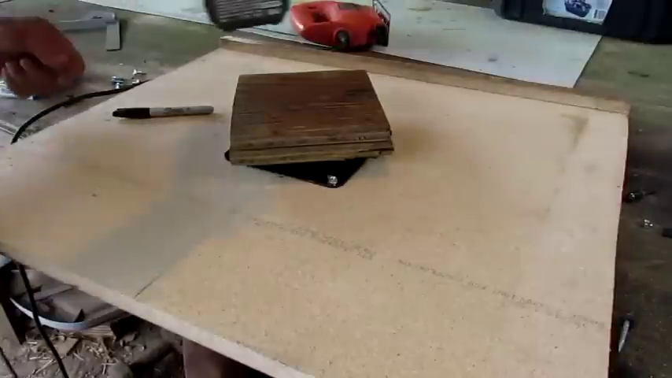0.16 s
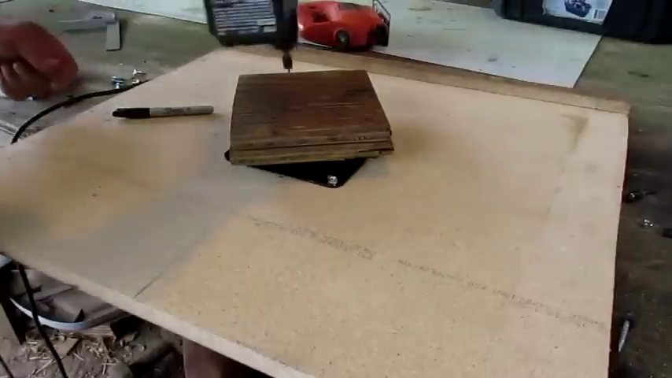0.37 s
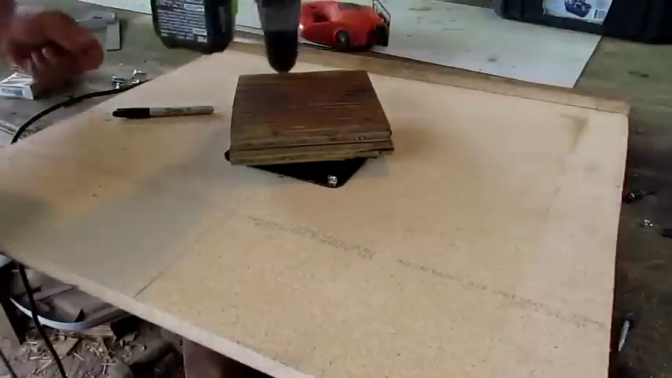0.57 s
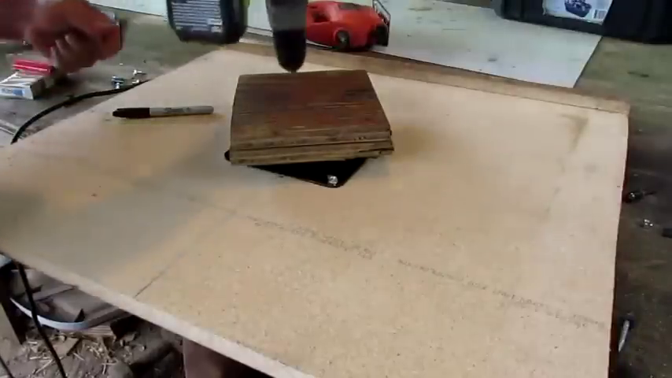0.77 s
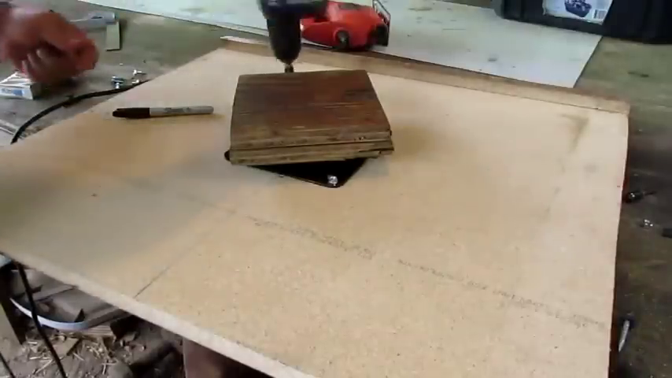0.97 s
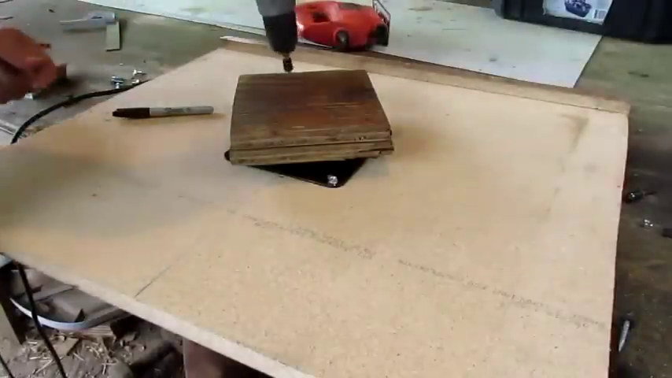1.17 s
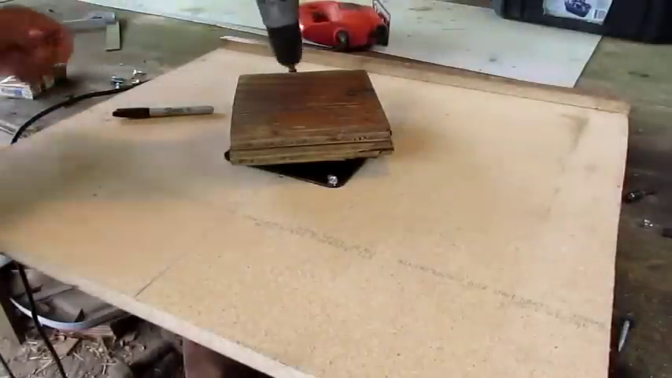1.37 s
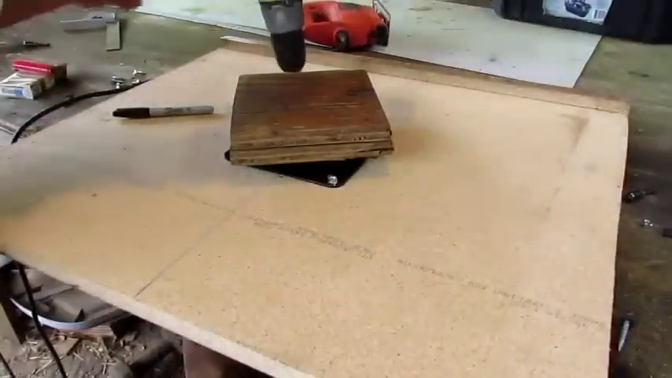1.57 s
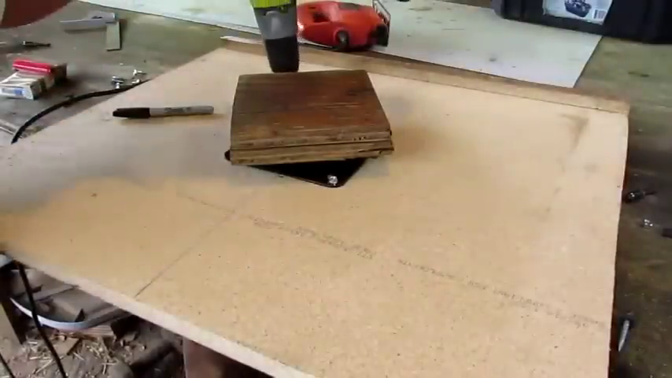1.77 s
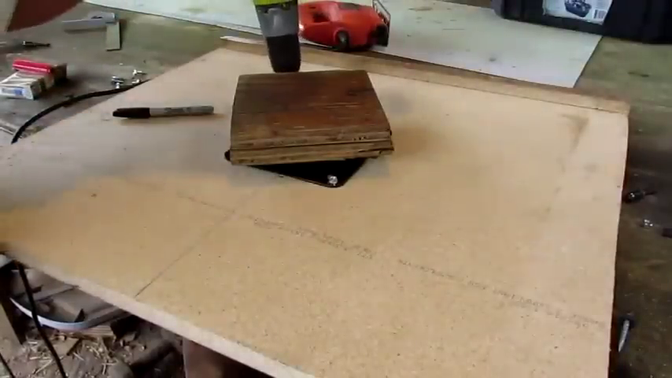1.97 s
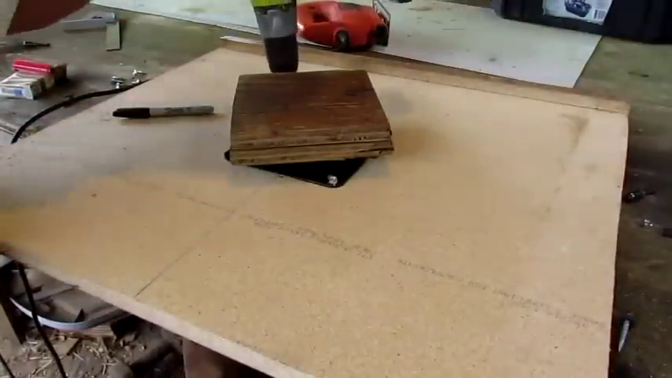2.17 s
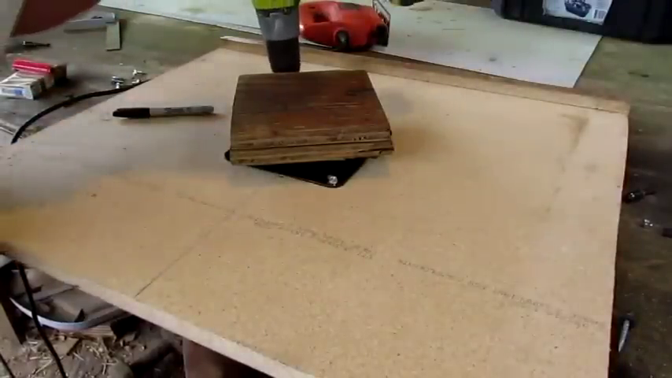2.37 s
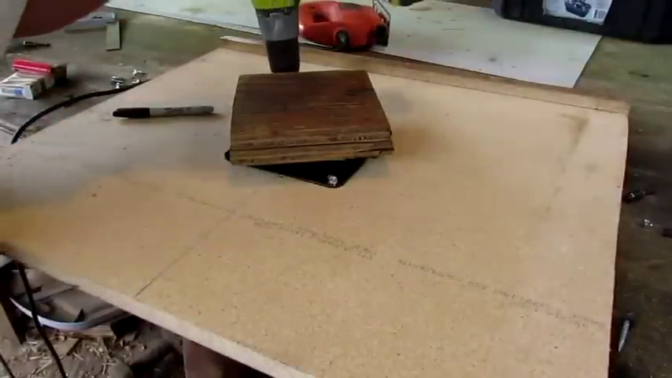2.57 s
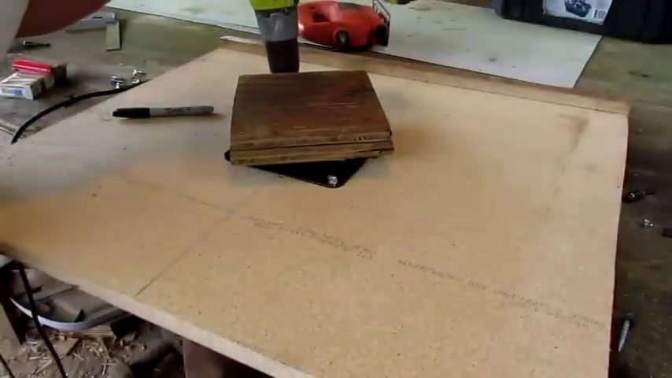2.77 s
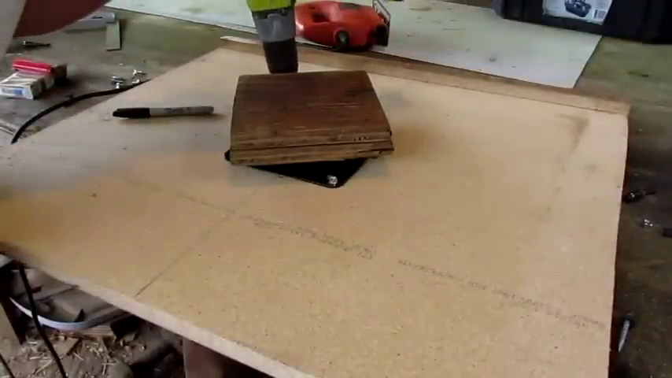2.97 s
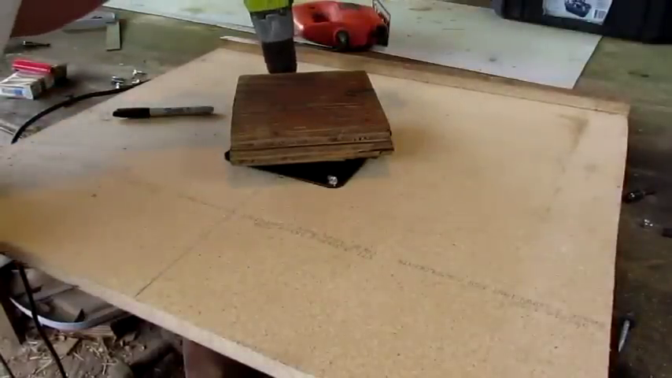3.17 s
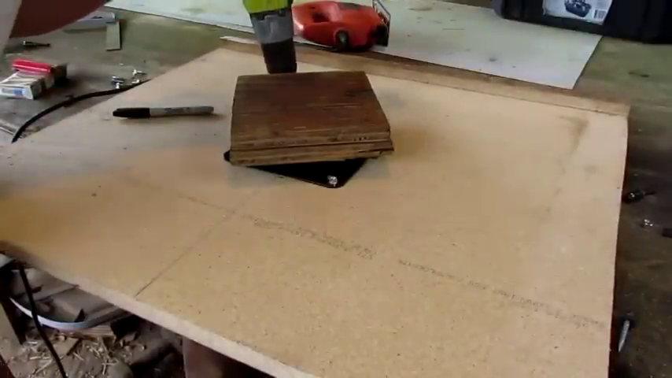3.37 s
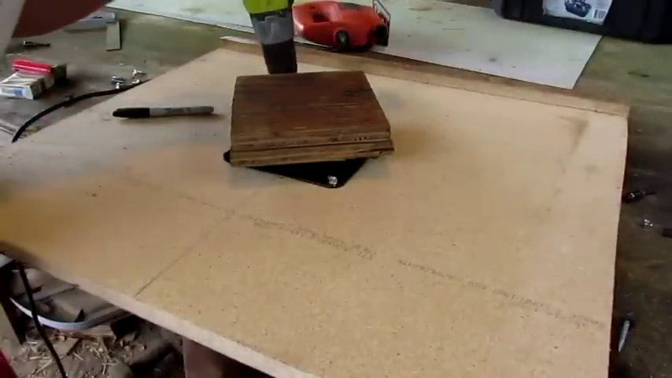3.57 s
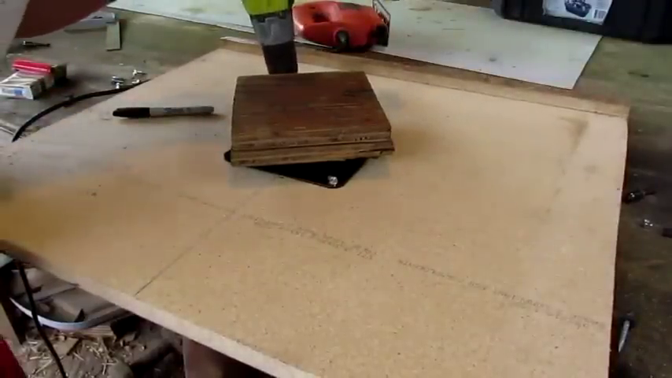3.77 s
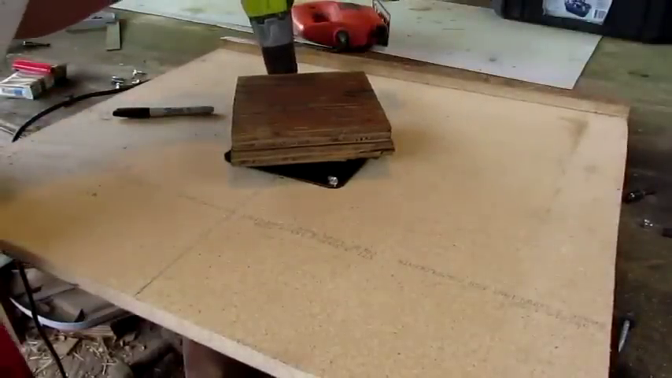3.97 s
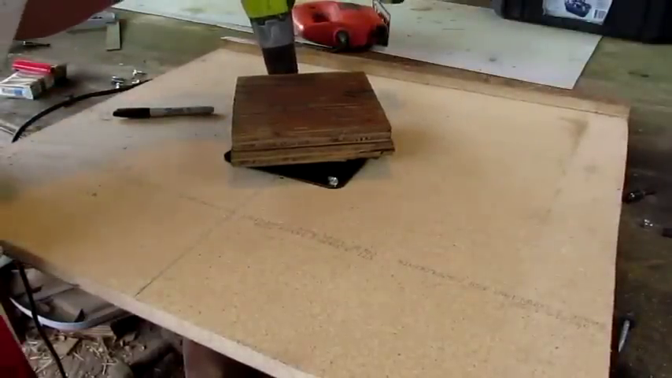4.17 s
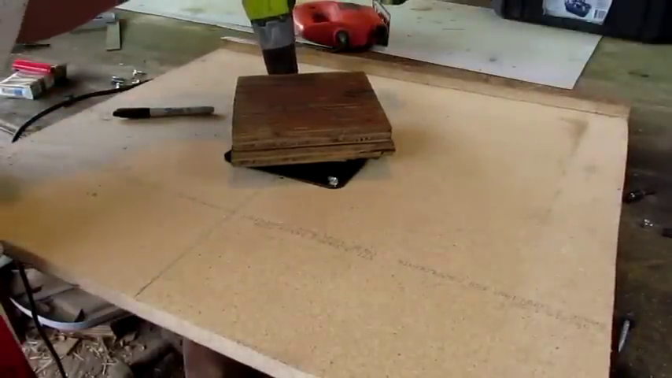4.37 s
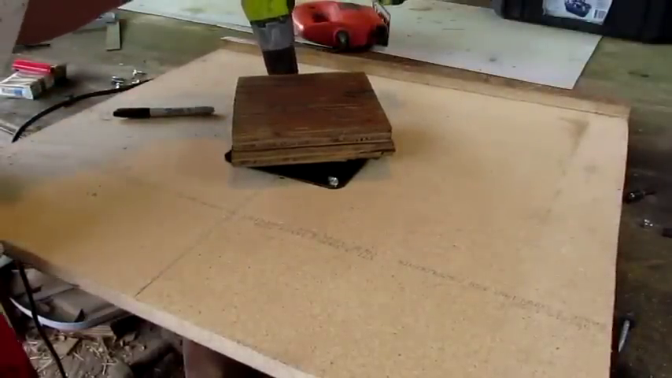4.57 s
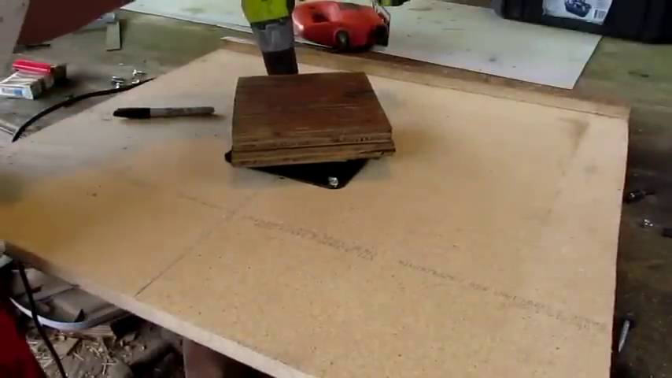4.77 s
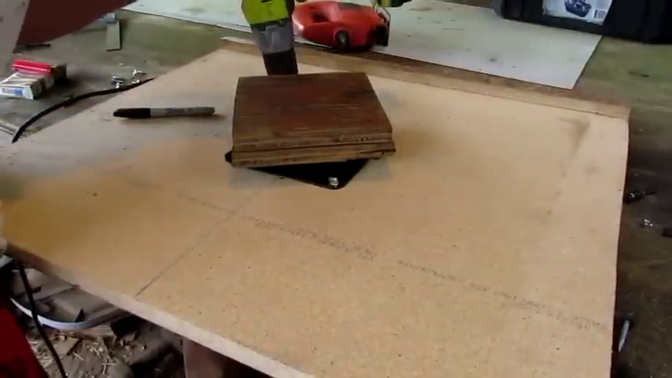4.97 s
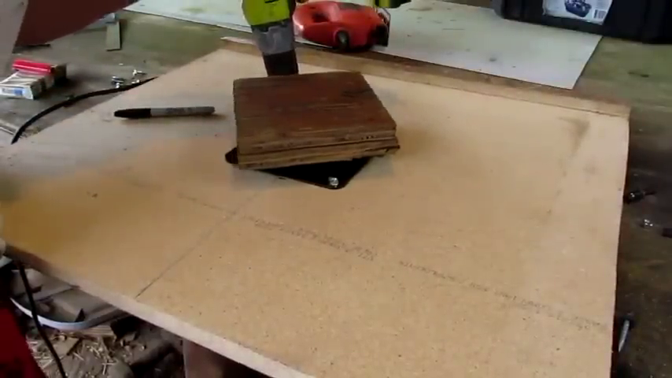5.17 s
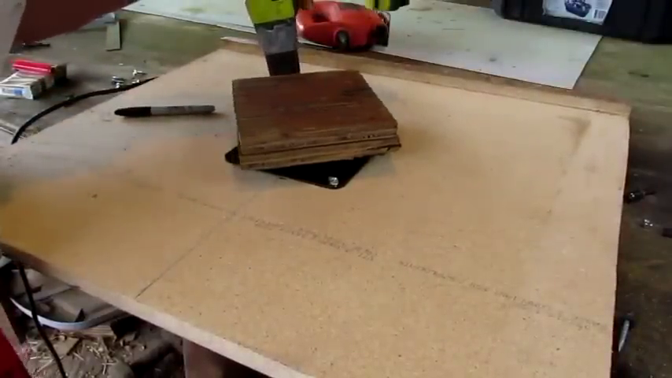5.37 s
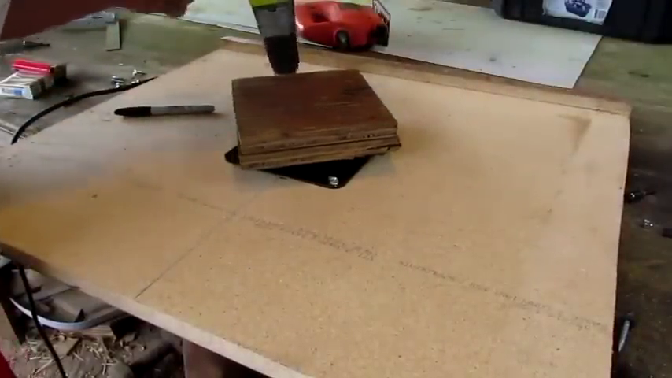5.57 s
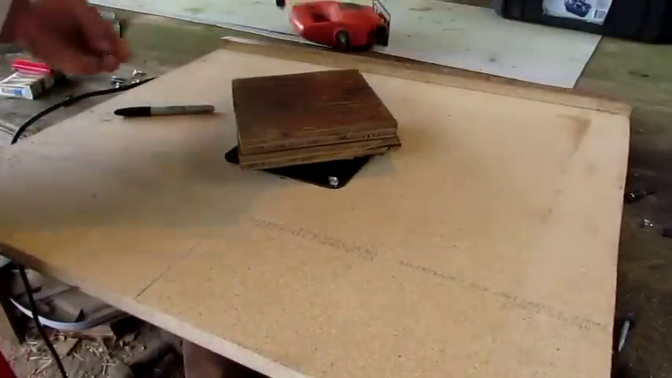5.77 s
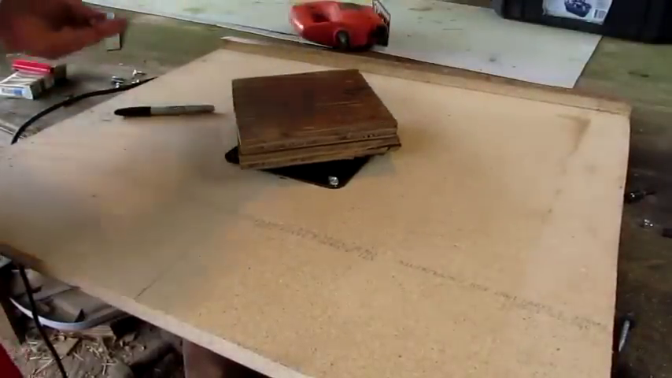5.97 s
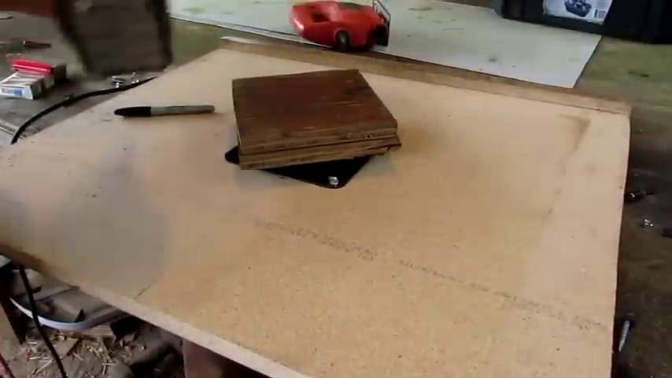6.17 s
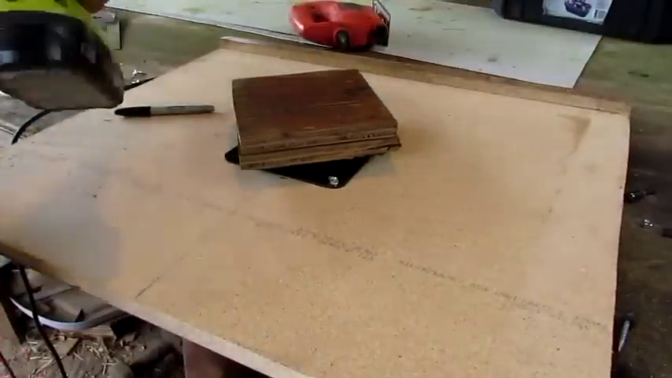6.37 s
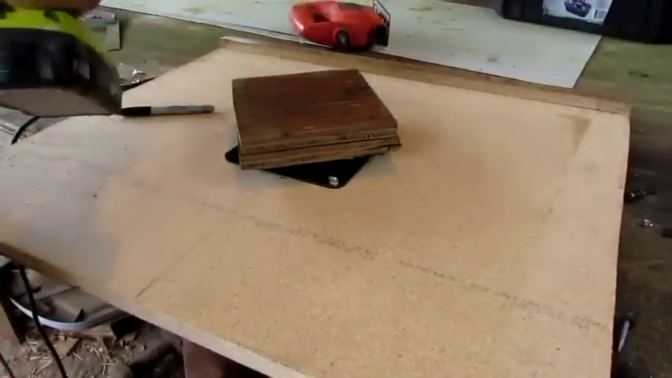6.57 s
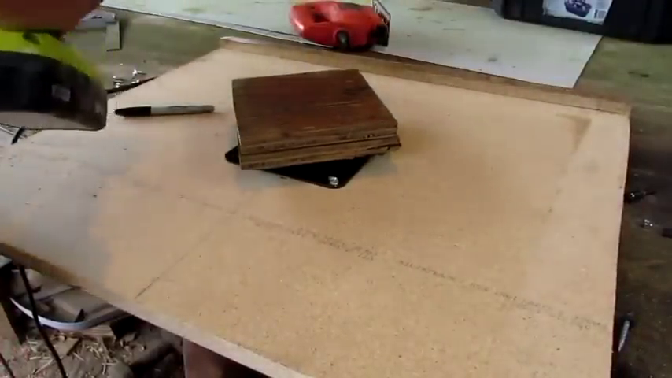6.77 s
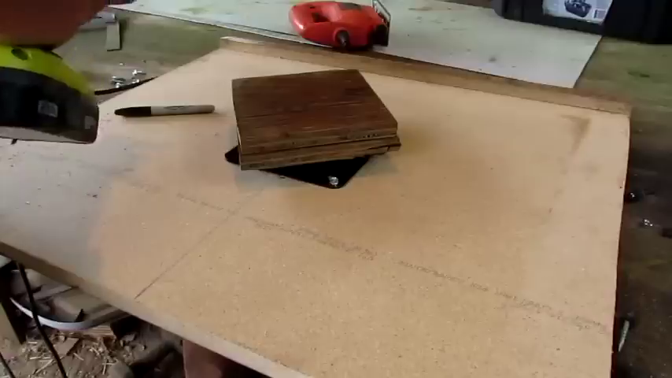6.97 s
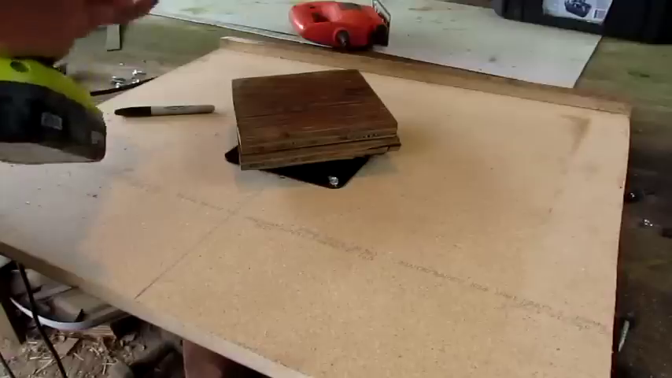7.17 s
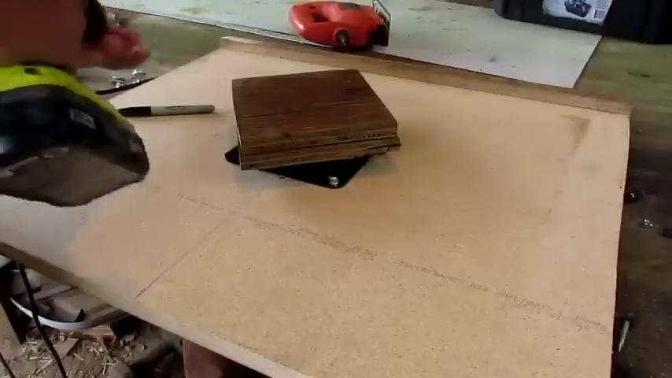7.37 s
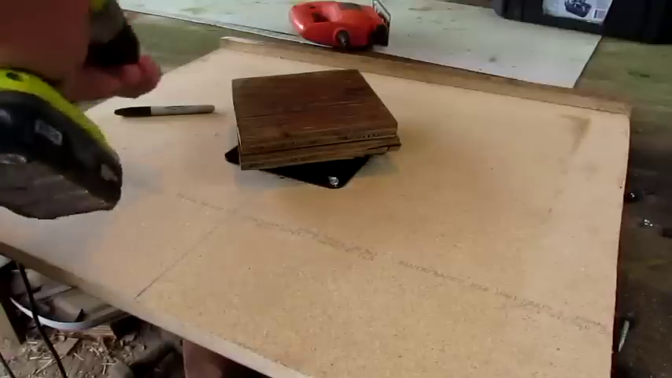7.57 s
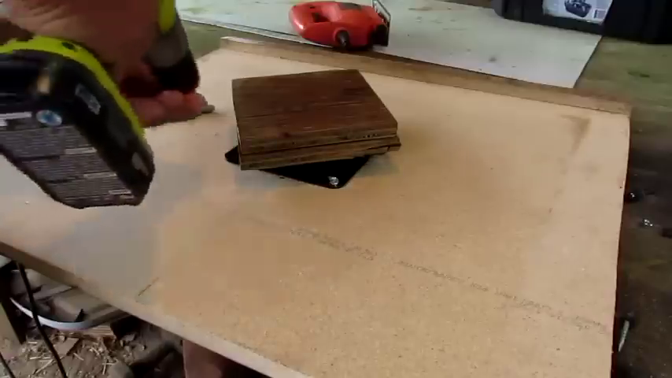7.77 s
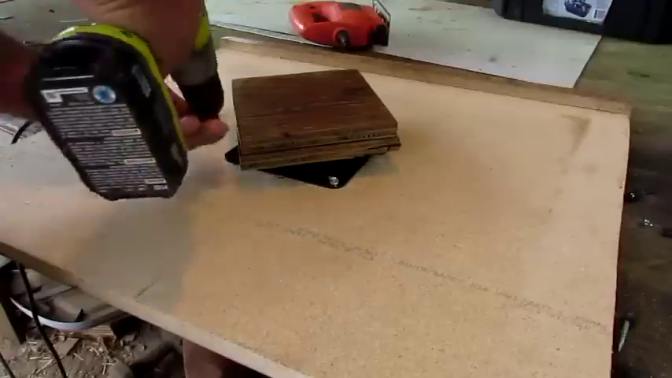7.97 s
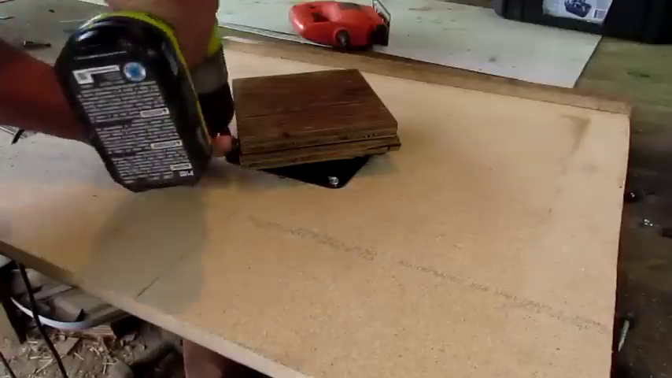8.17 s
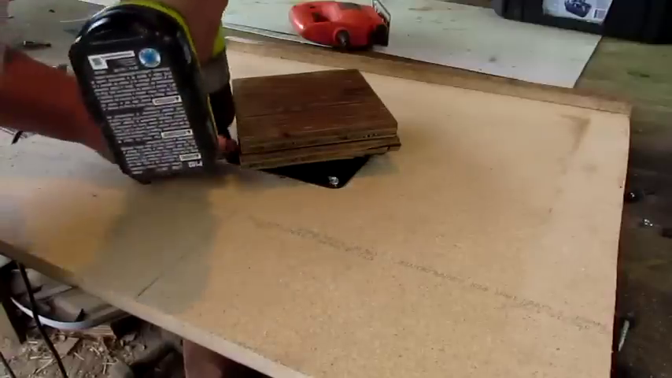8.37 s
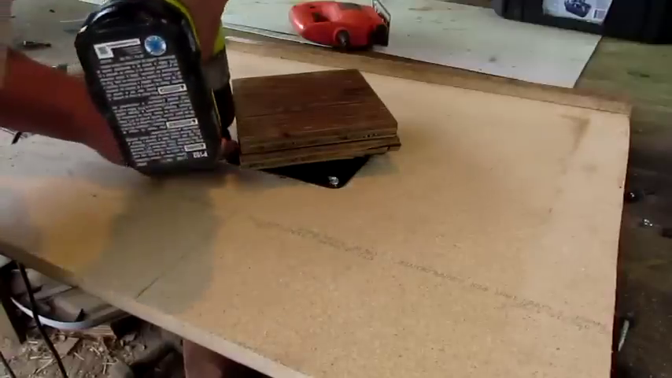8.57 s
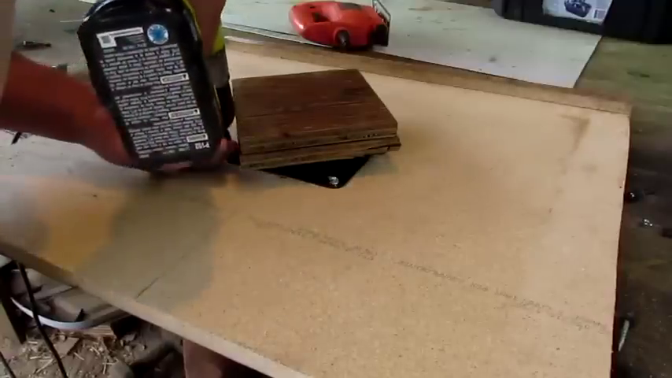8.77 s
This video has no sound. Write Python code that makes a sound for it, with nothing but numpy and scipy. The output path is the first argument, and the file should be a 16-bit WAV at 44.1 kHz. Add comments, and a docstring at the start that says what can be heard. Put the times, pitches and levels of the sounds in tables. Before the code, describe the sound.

Close in a small workshop with low hum and a thin, pulsing electronic whine. Tiny metallic ticks and a sharp wooden knock come first, then lighter block rattles. A cordless drill whistles, spins up in two steps, grinds a screw into plywood, sags under load and stops quickly. Afterwards there are a few plastic clicks and one soft knock.

```python
"""A thin high electronic whine pulses 65 times a second over a low hum; small hard ticks of screw, bit and trigger
join in and a plywood block knocks on a workbench. Then, at close range in a small workshop, a cordless drill drives
the screw into the block: the speed control whistles, motor and gears run up in two steps, sag under load and brake.
The drill clicks in the hand; two short insect rasps sound. Shaft-locked tones and filtered noise make the drill,
decaying modes the knocks, noise bursts the ticks and clicks."""
import sys
import numpy as np
from scipy import signal
from scipy.fft import rfft, irfft
from scipy.io import wavfile
from scipy.ndimage import uniform_filter1d

SR = 44100
rng = np.random.default_rng(int(sys.argv[2]) if len(sys.argv) > 2 else 0)


def transcribe(u):
    """Save the signal u as a 16-bit wav file named by the first command-line argument.

    u: samples, shape (n,) or (channels, n), limited to [-1, 1]; the rate is SR.
    q: integer samples, one column per channel.
    """
    v = np.clip(np.atleast_2d(u).T, -1, 1)
    q = np.round(v * 32767).astype(np.int16)
    wavfile.write(sys.argv[1], SR, q)


N = 388521
T = np.arange(N) / SR  # time, s
HIT = SR // 2  # samples in half a second, the length of every struck sound

# outline of the gear rattle: frequency_hz, relative_level_db
GEAR_OUTLINE = [(1500, -37), (3000, -16.5), (4300, -11), (5200, -6.5), (7000, -5.5), (8500, -8.5),
                (9800, -3.5), (10700, -9), (13800, -8.5), (14700, -18.5)]
# outline of the grinding wood: frequency_hz, relative_level_db
WOOD_OUTLINE = [(60, -45), (160, -3), (280, -2), (420, 3.5), (600, -1), (780, 3), (1000, -2.5),
                (1450, -0.5), (1630, 6), (1850, 0.5), (2250, 1.5), (2900, -3.5), (5000, -10.5),
                (12000, -48)]
# outline of the bench rumbling under the drill: frequency_hz, relative_level_db
RUMBLE_OUTLINE = [(40, -22.5), (80, 4), (115, -9), (165, 5.5), (215, -18), (500, -33)]
# uneven resistance of the wood: time_s, gear_rattle_db, grinding_db (both before small trims)
WOOD_LOAD = [(3.5, -20.5, -30), (3.7, -17.5, -28.5), (3.95, -18, -26.5), (4.68, -20.5, -27),
             (4.755, -18.5, -25.5), (4.865, -22.5, -27.5), (4.92, -19.5, -25.5), (5.26, -18, -25.5),
             (5.35, -19, -26)]
# uneven mesh of the gears: cycles_per_shaft_turn, depth_db
GEAR_MESH = [(1, -0.34), (2, -1), (3, 1.23), (4, -1.5), (5, 1.9)]
ENGAGED_HZ = 196  # shaft speed above which rattle and grinding get no louder
GEAR_DB_PER_OCTAVE, GRIND_DB_PER_OCTAVE = 10.5, 9.5  # rise of their levels up to that speed
UNLOAD_DB_PER_S = 230  # rattle and tones die away once the motor stops pushing
# tones: level at ENGAGED_HZ, rise with speed, loss as the screw head seats
WHINE_DB, WHINE_DB_PER_OCTAVE, WHINE_SEAT_DB_PER_S = -29.8, 10.5, 20
RUMBLE_DB, RUMBLE_DB_PER_OCTAVE = -38.5, -27  # level at ENGAGED_HZ, change above it


def drill():
    """Shaft-locked excitation: gears rattle, the screw grinds the wood, the bench rumbles and the motor whines."""
    hz = shaft_speed() * (1 + 0.0005 * walk(50))
    turn = 2 * np.pi * np.cumsum(hz) / SR
    # levels follow the speed
    octaves = np.log2(hz / ENGAGED_HZ)
    below, above = np.minimum(octaves, 0), np.maximum(octaves, 0)
    unload_db = UNLOAD_DB_PER_S * since(RELEASE_S)
    gear_db = curve(WOOD_LOAD) + GEAR_DB_PER_OCTAVE * below - unload_db
    grind_db = curve(WOOD_LOAD, axis=2) + GRIND_DB_PER_OCTAVE * below
    whine_db = WHINE_DB + WHINE_DB_PER_OCTAVE * octaves + GEAR_DB_PER_OCTAVE * below
    whine_db = whine_db - WHINE_SEAT_DB_PER_S * since(SEAT_S) - unload_db
    rumble_db = RUMBLE_DB + GRIND_DB_PER_OCTAVE * below + RUMBLE_DB_PER_OCTAVE * above
    # the mesh bites harder a few times a turn
    bite_db = sum(db * np.cos(k * turn) for k, db in GEAR_MESH) + 0.54 * walk(70)
    teeth = undb(bite_db + 0.37 * walk(4000))
    rattle = gear_case(noise(side_db=-12.5) * teeth)
    gears = unit(colour(rattle, GEAR_OUTLINE)) * undb(gear_db + 1.0)
    fibres = undb(1.8 * walk(45) + 2.6 * walk(700))
    grind = unit(colour(noise(side_db=-23) * fibres, WOOD_OUTLINE)) * undb(grind_db - 0.06)
    rumble = unit(colour(noise(side_db=-12), RUMBLE_OUTLINE)) * undb(rumble_db)
    return gears + (grind + rumble) * pan(db=-3.5) + whine(hz, turn) * undb(whine_db)


# squeezes of the trigger, half and then fully: start_s, speed_gain_hz, spin_up_time_constant_s
TRIGGER_SQUEEZES = [(3.33, 206, .115), (3.812, 94.7, .095)]
DRAG_S, SAG_HZ_PER_S = 4.45, 22.5  # the screw drags more as it goes deeper
SEAT_S, SEAT_HZ_PER_S2 = 5.08, 800  # then its head pulls into the wood
RELEASE_S, BRAKE_S = 5.35, 0.057  # the trigger is let go; time constant of the brake


def shaft_speed():
    """First-order lag, in turns per second: squeezes spin the motor up, the screw drags it, the brake stops it."""
    free = sum(hz * (1 - np.exp(-since(s) / lag)) for s, hz, lag in TRIGGER_SQUEEZES)
    sag = SAG_HZ_PER_S * since(DRAG_S) + SEAT_HZ_PER_S2 * since(SEAT_S) ** 2
    return np.maximum((free - sag) * np.exp(-since(RELEASE_S) / BRAKE_S), 1e-3)


# motor and gear tones: multiple_of_shaft_speed, relative_level_db
TONE_ORDERS = [(1, -14), (2, -10), (3, -22), (5, -29), (5.4, -29.5), (7, -26), (9, -20), (10, -23),
               (11, -20.5), (12, -15), (15, -19.5), (16, -11.5), (17, -15), (18, -12.5), (19, -13.5),
               (20, -17.5), (22, -17.5), (23, -15), (25, -17.5), (26, -12.5), (27, -10.5), (28, -19.5),
               (29, -16), (30, -22.5), (31, -11), (32, -22), (33, -17.5), (34, -13), (35, -18.5), (36, -14),
               (38, -13.5), (39, -18), (41, -12), (43, -9.5), (44, -14), (45, -8), (50, -11)]
# resonances of the gear case: centre_hz, width_hz, lift_of_tones_db, lift_of_rattle_db (before its swell)
CASE_MODES = [(1740, 200, 21, -6), (3230, 260, 5, -12), (7450, 250, -4, -5), (9330, 600, 11.5, -4),
              (11350, 300, -8, -7), (12350, 300, -3, -1)]
TONES_TOP_HZ = 14000  # tones fade away above this
CASE_SWELL_DB = 1.5  # random swell of each resonance in the rattle


def whine(hz, turn):
    """Order tones: multiples of the shaft speed waver, and swell on passing a resonance of the gear case."""
    out, running = np.zeros((2, N)), hz > 1
    hz, turn, size = hz[running], turn[running], running.sum()
    tones = 0
    for k, db in TONE_ORDERS:
        case = 1 + sum(undb(lift_db) / (1 + (2 * (k * hz - centre) / width) ** 2)
                       for centre, width, lift_db, _ in CASE_MODES)
        muffle = 1 / (1 + (k * hz / TONES_TOP_HZ) ** 10)
        # each tone has its own phase difference between the channels
        lag = rng.uniform(0, 2 * np.pi) + rng.uniform(-0.45, 0.22) * np.array([[1], [-1]])
        flutter_db = 3.0 * walk(35, size=size)
        play = 0.2 * walk(90, size=size)  # the teeth have a little play
        tones = tones + undb(db + flutter_db) * case * muffle * np.sin(k * turn + play + lag)
    out[:, running] = tones
    return out


def gear_case(rattle):
    """Resonance: the rattle rings the modes of the case, each swelling and fading on its own."""
    out = rattle
    for hz, width, _, db in CASE_MODES:
        b, a = signal.iirpeak(hz, hz / width, fs=SR)
        out = out + signal.lfilter(b, a, rattle) * undb(db + CASE_SWELL_DB * walk(16))
    return out


# whistles, faint at first touch and louder once the motor turns:
# start_s, length_s, pitch_hz, glide_hz_per_s, level_db, fade_db_per_s
CONTROL_WHISTLES = [(3.291, .077, 5950, -3800, -45, 0), (3.36, .26, 5490, 1591, -28, 57)]
WHISTLE_OCTAVE_DB = -46  # level of the second harmonic


def speed_control():
    """Forced vibration: chopped current whistles in the windings; the pitch steps down as the trigger closes."""
    out = np.zeros((2, N))
    for s, length, hz, glide, db, fall in CONTROL_WHISTLES:
        pitch = (hz + glide * since(s)) * (1 + 0.0053 * walk(400))
        phase = 2 * np.pi * np.cumsum(pitch) / SR
        gate = np.interp(T - s, [0, .006, length, length + .006], [0, 1, 1, 0])
        out += gate * (undb(db - fall * since(s)) * np.sin(phase) + undb(WHISTLE_OCTAVE_DB) * np.sin(2 * phase))
    add(out, 3.357, undb(-22.5) * ring([(3700, 0, 0.028)]))  # the rotor breaks free with a ping
    return out


# block knocks on the bench: start_s, level_db, and relative to it plate_db, crack_db, thud_db (before trims)
BLOCK_KNOCKS = [(0.580, -9.5, -25, -31, -36), (0.6094, -15.5, 1.5, -25, -19), (0.619, -25, 2, -25, -15),
                (0.632, -26.5, 7, -24, -7), (0.688, -25, -4, -21, -6.5), (0.784, -35, -6, -31, -5.5),
                (0.859, -31.5, -11, -21.5, -10.5), (1.691, -30, -17, -40, -12.5),
                (1.733, -29.5, -4.5, -26, -8), (1.853, -39, -10, -21, 2), (2.117, -43.5, -6, -30, 7),
                (2.222, -33.5, -9, -12, -7), (2.258, -28, -4, -15, -9), (2.271, -28, -3, -18, -12),
                (2.301, -35, -12, -11, -3), (2.318, -40, -5, -12, -8), (2.346, -40, -6, -28, 1),
                (3.46, -26, 6, -32, -12), (5.5, -35, -13, -22, -27), (5.547, -46, -3, -5.5, -24),
                (5.566, -43.5, -8, -3.5, -23), (8.72, -37, -3, -18, 4)]
# modes of the block: frequency_hz, relative_level_db, t60_s
BLOCK_MODES = [(378.4, -0.5, 0.093), (640, -1, 0.014), (824, 0, 0.048), (1013, -8, 0.07),
               (1230, -17, 0.065), (1410, -14.5, 0.045), (1920, -23, 0.046)]
# modes of the plate that the block rocks on: frequency_hz, relative_level_db, t60_s
PLATE_MODES = [(241, -1, 0.12), (452.4, -0.5, 0.15), (583, -3, 0.073), (1097, -6, 0.067), (1590, -6, 0.037),
               (1780, -15, 0.034)]
# modes of the bench: frequency_hz, relative_level_db, t60_s
BENCH_MODES = [(64, -10, 0.45), (81.7, -6.5, 0.4), (112.6, -8, 0.27), (162.3, -0.5, 0.19),
               (218.4, -5.5, 0.089)]


def knocks():
    """Modal impact: the block rings on each blow, its edge cracks on the board, the bench thuds underneath."""
    clatter_outline = [(100, -12.0), (300, -0.5), (900, -2.0), (1500, -30.0), (4000, -34.0), (10000, -67)]
    crack_outline = [(500, -13), (1300, 11), (2300, 7.5), (4000, -4.5), (12000, -38)]
    out = np.zeros((2, N))
    for s, db, plate_db, crack_db, thud_db in BLOCK_KNOCKS:
        clatter = colour(noise(side_db=-26.0, size=HIT) * fade(0.11), clatter_outline)
        crack = colour(noise(side_db=-14.0, size=HIT) * fade(0.071), crack_outline)
        body = peak(ring(BLOCK_MODES)) + undb(plate_db) * peak(ring(PLATE_MODES)) + undb(-2.5) * peak(clatter)
        thud = peak(ring(BENCH_MODES) * (1 - fade(0.039)))  # the heavy bench takes a moment to swing
        blow = body + undb(crack_db + 14.0) * peak(crack) + undb(thud_db + 5) * thud
        add(out, s, undb(db - 1.5) * blow)
    return out * pan(db=-3.5)


# small hard ticks of screw, bit and trigger: start_s, level_db (before a gain)
HARD_TICKS = [(0.4006, -39), (0.4385, -35), (0.461, -38), (0.4879, -37), (0.5413, -37), (0.559, -32),
              (0.582, -18), (0.6788, -33), (1.1007, -27.5), (1.14, -27.5), (1.1854, -23), (1.217, -29),
              (1.8547, -29), (2.8265, -32), (3.043, -28), (3.1466, -28.5), (3.152, -28), (3.1865, -32.5),
              (3.273, -17), (3.2765, -30), (3.3125, -26), (5.537, -38), (5.565, -39)]
# outline of the ticks: frequency_hz, relative_level_db
TICK_OUTLINE = [(300, -14), (1000, -3), (2500, -2.5), (5000, -1.5), (8500, 1), (11000, -0.5), (14000, -11),
                (16000, -21)]


def ticks():
    """Hard contact: short bright bursts for the small ticks of screw, bit and trigger."""
    events = list(HARD_TICKS) + fiddling()
    return snaps(events, TICK_OUTLINE, t60=0.021, tail_db=-16, tail_t60=0.043, gain_db=1.0)


# the screw is fiddled onto the bit: start_s, end_s, typical_level_db (before the gain of the ticks)
FIDDLING_SPELLS = [(0.329, 0.555, -42), (1.1, 1.2, -39)]
FIDDLE_PER_S, FIDDLE_SPREAD_DB = 45, 3  # how many of those ticks, and how much they differ


def fiddling():
    """Random contacts: times and levels of faint ticks while the screw is handled."""
    events = []
    for start, end, db in FIDDLING_SPELLS:
        for _ in range(int((end - start) * FIDDLE_PER_S)):
            events.append((rng.uniform(start, end), db + FIDDLE_SPREAD_DB * rng.standard_normal()))
    return events


# the drill's plastic parts click: start_s, level_db (before a gain)
DRILL_CLICKS = [(0.6694, -20), (1.8555, -22), (2.222, -25.5), (2.266, -28), (2.279, -29), (2.3098, -26.5),
                (2.32, -30), (6.9424, -22), (6.949, -18), (7.3412, -18.5), (7.3517, -13), (7.644, -29),
                (7.728, -35), (8.74, -33)]
# outline of the plastic clicks: frequency_hz, relative_level_db
PLASTIC_OUTLINE = [(400, -5), (1500, 1), (2500, 14), (3600, 13), (5000, 8), (6500, 8), (9000, 7),
                   (12000, -5), (15000, -8)]


def clicks():
    """Hard contact: short bursts coloured by the drill's plastic parts."""
    return snaps(DRILL_CLICKS, PLASTIC_OUTLINE, t60=0.014, tail_db=-23, tail_t60=0.14, gain_db=-0.5)


def snaps(events, outline, t60, tail_db, tail_t60, gain_db):
    """Two-stage decay: each small hard contact is a brief crack with a weak rattle after it."""
    out = np.zeros((2, N))
    for s, db in events:
        burst = noise(side_db=-8.5, size=HIT) * (fade(t60) + undb(tail_db) * fade(tail_t60))
        add(out, s, undb(db + gain_db) * peak(colour(burst, outline)))
    return out


# short insect rasps: start_s, level_db, centre_hz
INSECT_RASPS = [(0.745, -42.5, 6840), (6.675, -40, 7100)]
RASP_ATTACK_S, RASP_HOLD_S, RASP_FADE_DB_PER_S = 0.0093, 0.039, 113


def insects():
    """Band-limited noise: two short rasps swell quickly and die away."""
    out = np.zeros((2, N))
    for s, db, hz in INSECT_RASPS:
        band = [(hz * 0.76, -50), (hz * 0.89, -4), (hz, 0), (hz * 1.1, -3), (hz * 1.18, -50)]
        swell = np.minimum(since(s) / RASP_ATTACK_S, 1) * undb(-RASP_FADE_DB_PER_S * since(s + RASP_HOLD_S))
        out += unit(colour(noise(side_db=-0.5), band)) * swell * undb(db + 1.6 * walk(200))
    return out


# outline of the high electronic whine: frequency_hz, relative_level_db
HIGH_WHINE_OUTLINE = [(6000, -16.5), (8400, -21.5), (8900, -12), (9450, -6), (9750, -2), (10050, -14),
                      (10500, -27)]
HIGH_WHINE_DB, PULSE_HZ, PULSE_DEPTH_DB = -51.2, 65.1, 1  # level; rate and depth of the pulsing


def electronic_whine():
    """Amplitude modulation: a thin high band of noise pulses 65 times a second."""
    pulses = undb(PULSE_DEPTH_DB * np.cos(2 * np.pi * PULSE_HZ * T))
    band = unit(colour(noise(side_db=0.0) * pulses, HIGH_WHINE_OUTLINE))
    return band * undb(HIGH_WHINE_DB + 1.0 * walk(60) + .5 * walk(2.1)) * pan(db=3.5)


# outline of the steady room noise: frequency_hz, relative_level_db
ROOM_OUTLINE = [(20, -22), (45, -2.5), (75, -0.5), (110, -3), (190, -7.5), (310, -7), (480, -12),
                (700, -13), (900, -12), (1300, -19), (3000, -28), (4500, -32.5), (7000, -34.5),
                (11500, -35), (14000, -42), (15500, -56)]
# mains buzz: pitch_hz, level_db
MAINS_TONES = [(241, -63), (301, -58), (360.5, -62.5)]
ROOM_DB, HUM_HZ, HUM_DB = -49.3, 80.7, -48.5


def background():
    """Broadband and tonal noise: dull room air, a wavering low hum and a thin mains buzz."""
    air = unit(colour(noise(side_db=-13.5), ROOM_OUTLINE)) * undb(ROOM_DB + 0.8 * walk(1.39))
    hum_phase = 2 * np.pi * np.cumsum(HUM_HZ + 1.5 * walk(10)) / SR
    hum = np.sin(hum_phase) * undb(HUM_DB + 2.5 * walk(3.99))
    buzz = sum(np.sin(2 * np.pi * hz * T + 0.63 * walk(8)) * undb(db + 2 * walk(4.5)) for hz, db in MAINS_TONES)
    return (air + buzz + hum) * pan(db=-5.5)


def workshop(x, wet_db, t60):
    """Diffuse reverberation: short decaying reflections, different at each ear."""
    late = T[:HIT] > .004  # the reflections start after 4 ms
    tail = colour(rng.standard_normal((2, HIT)) * fade(t60) * late, [(100, -3), (3000, 1.0), (14000, 3.5)])
    tail /= np.sqrt(np.sum(tail ** 2) / 2)
    return x + undb(wet_db) * signal.fftconvolve(x, tail, axes=1)[:, :N]


def undb(db):
    """Logarithmic level: decibels to gain."""
    return 10 ** (np.asarray(db) / 20)


def unit(x):
    """Effective value: scale to rms 1."""
    return x / np.sqrt(np.mean(x ** 2))


def peak(x):
    """Peak value: scale to peak 1."""
    return x / np.abs(x).max()


def since(s):
    """Elapsed time: seconds gone by since time s, zero before it."""
    return np.maximum(T - s, 0)


def curve(rows, axis=1):
    """Linear interpolation: one column of a table, joined by straight lines in time."""
    rows = np.array(rows)
    return np.interp(T, rows[:, 0], rows[:, axis])


def walk(rate, size=N):
    """Smoothed random steps: levels held 1 / rate s and slewed twice; spread near 1."""
    k = max(int(SR / rate), 1)
    steps = np.repeat(rng.standard_normal(size // k + 1), k)
    return 1.15 * uniform_filter1d(uniform_filter1d(steps, k), k)[:size]


def colour(x, points):
    """Minimum phase: causal filter with the given (Hz, dB) outline, built from its cepstrum."""
    hz, db = np.transpose(points)
    size = 4096
    grid = np.maximum(np.fft.rfftfreq(size, 1 / SR), 1)
    cepstrum = irfft(np.log(undb(np.interp(np.log(grid), np.log(hz), db))))
    # fold the cepstrum onto positive times
    cepstrum[1:size // 2] *= 2
    cepstrum[size // 2 + 1:] = 0
    response = irfft(np.exp(rfft(cepstrum)))[:size // 2]
    return signal.fftconvolve(x, response[None], axes=1)[:, :x.shape[1]]


def noise(side_db, size=N):
    """Partial coherence: stereo noise with a common part and a part of opposite sign at side_db."""
    mid, side = rng.standard_normal((2, size))
    return unit(mid + undb(side_db) * np.array([side, -side]))


def pan(db):
    """Level difference: gains of the two channels for a left-minus-right level."""
    return undb(np.array([[db], [-db]]) / 2)


def fade(t60):
    """Exponential decay: half a second of envelope, falling 60 dB in t60 s."""
    return undb(-60 * T[:HIT] / t60)


def ring(modes):
    """Modal decay: half a second of struck modes, each a little different on every blow."""
    chance = rng.standard_normal((len(modes), 2))
    out = 0
    for (hz, db, t60), (a, b) in zip(modes, chance):
        gain = rng.choice([-1, 1]) * undb(db + 2 * a)
        out = out + gain * fade(t60) * np.sin(2 * np.pi * hz * (1 + 0.021 * b) * T[:HIT])
    return out


def add(out, s, sound):
    """Superposition: mix a sound in at time s."""
    i = int(s * SR)
    out[:, i:i + sound.shape[-1]] += sound[..., :N - i]


def scene():
    """Superposition: drill, block and small contacts reverberate in the workshop, over the background."""
    near = drill() + speed_control() + knocks() + clicks() + ticks()
    far = insects() + electronic_whine() + background()
    return workshop(near, wet_db=-10.0, t60=0.18) + far


TOP_HZ = 15500


def record(dry):
    """Band limiting: a steep elliptic low-pass cuts the top."""
    low_pass = signal.ellip(10, .2, 80, TOP_HZ, fs=SR, output="sos")
    return signal.sosfilt(low_pass, dry, axis=-1)


dry = scene()
out = record(dry)
transcribe(out)
```